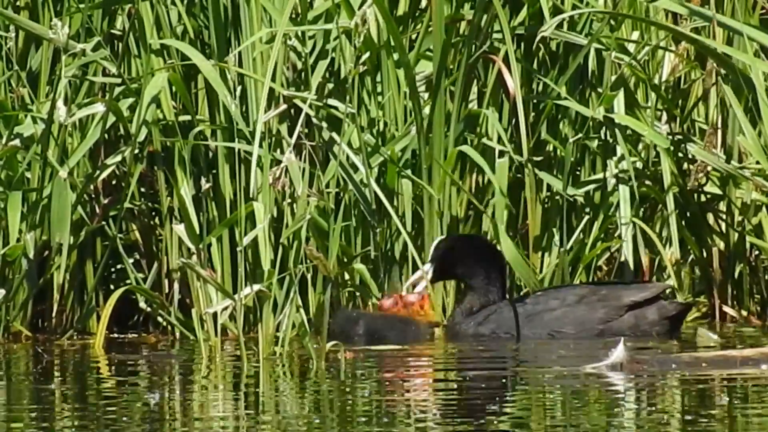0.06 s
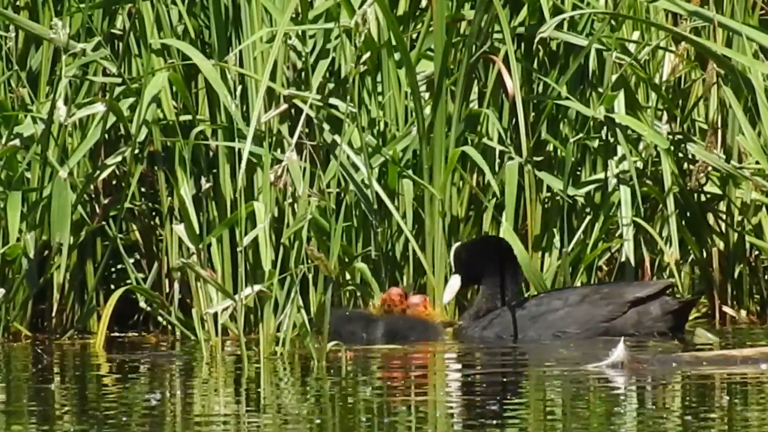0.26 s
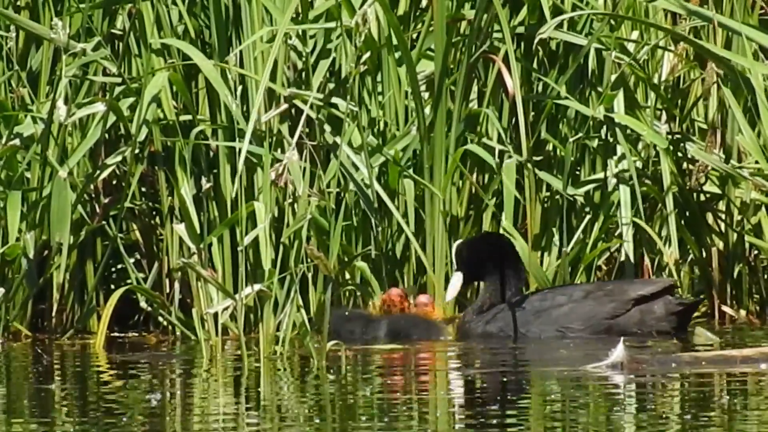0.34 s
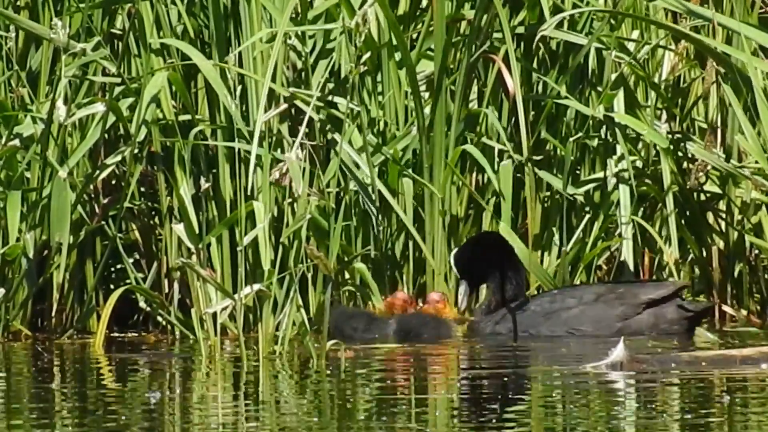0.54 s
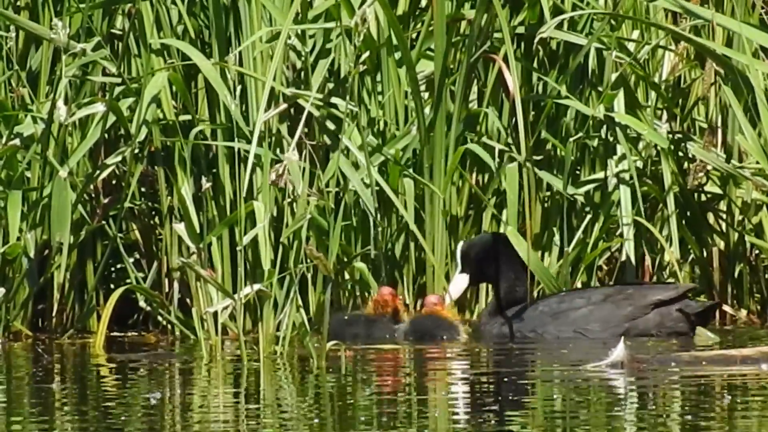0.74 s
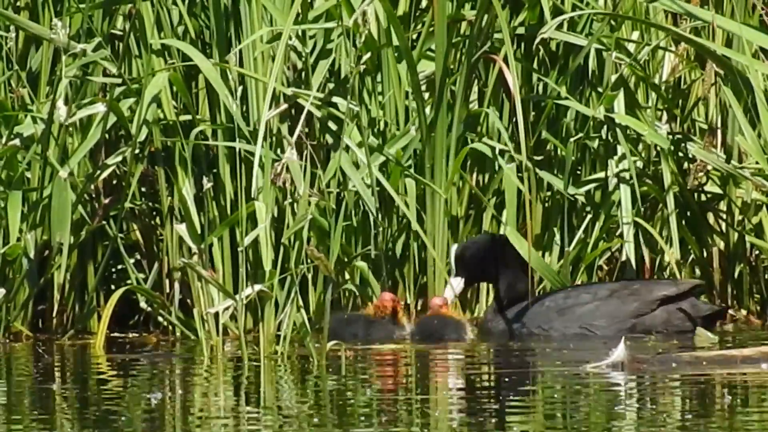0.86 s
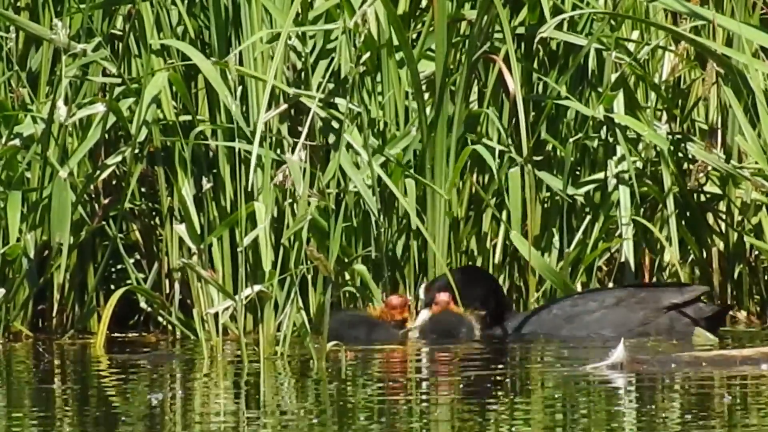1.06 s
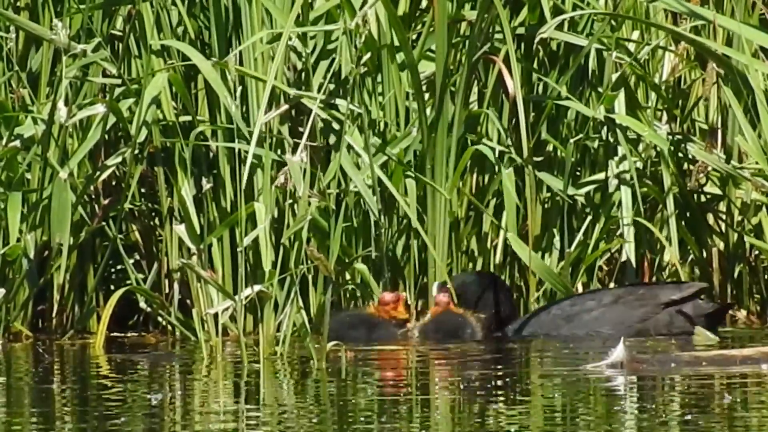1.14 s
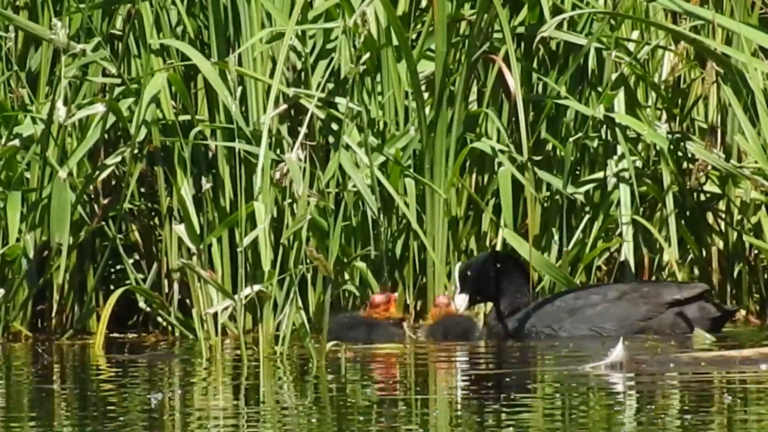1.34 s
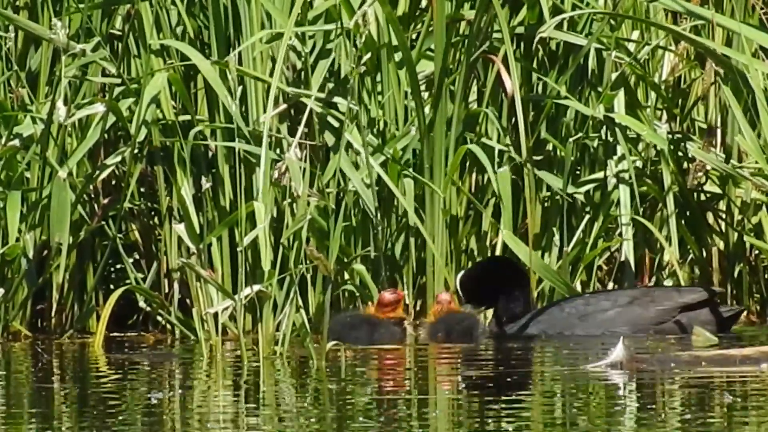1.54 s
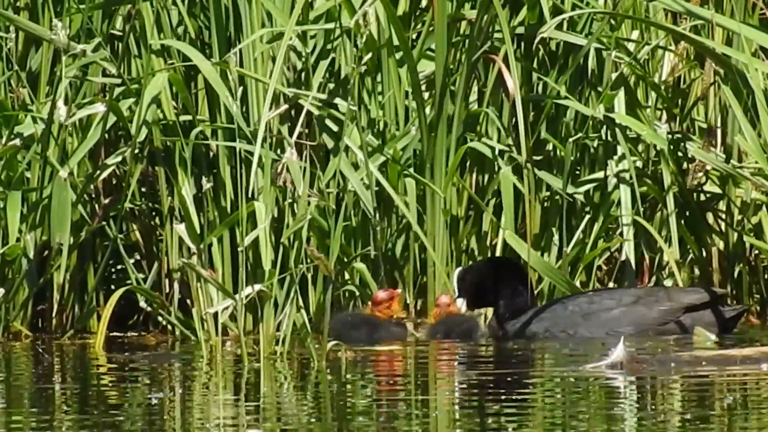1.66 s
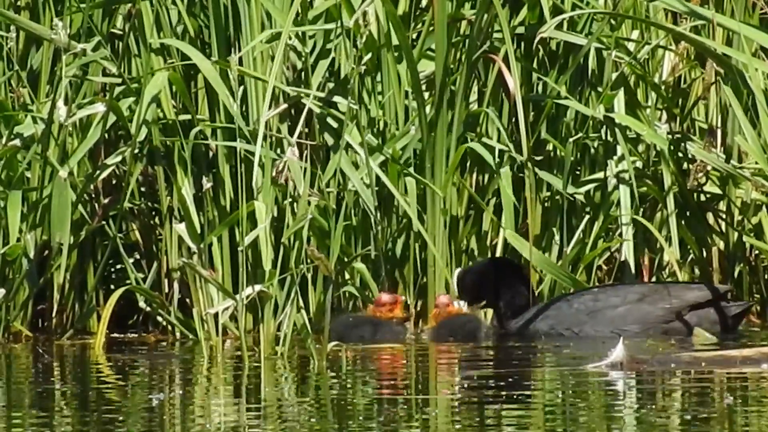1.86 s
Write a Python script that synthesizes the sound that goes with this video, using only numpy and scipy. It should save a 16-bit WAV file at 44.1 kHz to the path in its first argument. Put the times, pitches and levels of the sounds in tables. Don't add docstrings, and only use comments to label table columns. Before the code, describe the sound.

Faint hoarse chatter over soft outdoor rumble, then a near warbler's gritty two-toned trill, abrupt chack and throbbing rasp, followed by thin far whistles and quick glides; close stereo microphones, open pond edge with diffuse reed echoes.

```python
import sys
import numpy as np
from scipy import signal
from scipy.fft import rfft, irfft
from scipy.io import wavfile
from scipy.ndimage import uniform_filter1d

SR = 44100
rng = np.random.default_rng(int(sys.argv[2]) if len(sys.argv) > 2 else 0)


def undo_db(level):
    steps = np.asarray(level, float) / 20
    return 10 ** steps


def output_pcm(signal):
    pcm = np.clip(np.atleast_2d(signal).T, -1, 1) * 32767
    wavfile.write(sys.argv[1], SR, np.round(pcm).astype(np.int16))


N = 83790
T = np.arange(N) / SR

# pitch_hz [Hz], density_db [dB per Hz]
FLOOR_SPECTRUM = [(40, -4.5), (66, -2), (200, -10), (300, -16.5), (600, -16), (800, -22), (3000, -23.5),
                  (7500, -28.5)]
# pitch_hz [Hz], side_over_mid_db [dB]
FLOOR_WIDTH = [(40, -22), (130, -16.5), (300, -11.5), (1500, -9), (3500, -8), (7000, 1.5), (15000, 2)]
# pitch_hz [Hz], width_hz [Hz], level_db [dB]
DRONES = [(55.8, 11.5, -65.5), (93.3, 26.6, -65), (171.3, 46, -64.5), (611, 64, -77.5), (1142, 550, -73),
          (6430, 1900, -72)]
# start_s [s], length_s [s], from_hz [Hz], to_hz [Hz], level_db [dB]
HOARSE_CALLS = [(-.04, .07, 6600, 6200, -64), (.07, .1, 5900, 5750, -70), (.08, .07, 6700, 6200, -69),
                (.11, .08, 2600, 2800, -68), (1.21, .06, 4200, 4250, -71), (1.37, .1, 7600, 7000, -69),
                (1.622, .05, 4200, 4250, -64), (1.79, .08, 6200, 6100, -67), (1.77, .1, 2050, 2250, -70),
                (1.328, .03, 4600, 4450, -62), (.15, .08, 6000, 5700, -70), (.96, .03, 3700, 3650, -69),
                (.11, .08, 1900, 1500, -68), (.06, .08, 5300, 5200, -72), (1.68, .08, 6600, 6400, -71),
                (1.44, .09, 7050, 6800, -66), (1.48, .09, 3500, 3100, -69), (1.7, .19, 5000, 4900, -72),
                (0, .2, 4900, 4700, -73), (.02, .12, 3900, 3750, -73), (.12, .07, 2250, 2200, -70),
                (.46, .07, 2450, 2500, -66), (1.32, .18, 950, 1150, -72), (1.54, .07, 6700, 6500, -69)]
# start_s [s], length_s [s], from_hz [Hz], to_hz [Hz], level_db [dB]
FAR_WHISTLES = [(.795, .025, 3050, 3550, -67), (.81, .06, 3550, 3620, -64.5),
                (.862, .045, 3620, 3350, -62.5), (.9, .05, 3550, 3450, -65), (.945, .045, 3420, 3600, -62),
                (.965, .09, 2210, 2190, -67), (1.062, .065, 1700, 2200, -64),
                (1.125, .035, 2250, 2950, -63), (1.298, .035, 5080, 5050, -63),
                (1.322, .012, 4800, 4000, -62), (1.333, .014, 4750, 3850, -60),
                (1.345, .012, 3900, 2950, -61), (1.355, .04, 5080, 5080, -66),
                (1.42, .035, 5100, 5100, -71), (1.372, .016, 4600, 4100, -66),
                (1.355, .015, 3500, 3250, -67), (1.368, .125, 6980, 5900, -53.5),
                (1.617, .03, 6350, 5900, -55.5), (1.645, .04, 5900, 5450, -65),
                (1.0, .025, 6300, 5900, -73), (1.435, .02, 2850, 2900, -70), (1.485, .05, 5900, 5550, -63)]
# start_s [s], length_s [s], from_hz [Hz], to_hz [Hz], level_db [dB]
FAR_SWOOPS = [
    (1.458, .068, 3800, 2050, -57.5),
    (1.575, .05, 2300, 3700, -56),
]
# time_s [s], level_db [dB]
RASP_EFFORT = [
    (.568, -52),
    (.582, -55),
    (.612, -49),
    (.666, -56),
    (.704, -53),
    (.73, -90),
]
# pitch_hz [Hz], width_hz [Hz], level_db [dB]
RASP_RESONANCES = [(2200, 970, -7), (2860, 1050, -1.5), (4600, 390, -3.5), (5260, 1600, -2.5),
                   (6180, 1140, -0.5), (8400, 2400, -5)]
# start_s [s], length_s [s], from_hz [Hz], to_hz [Hz], level_db [dB]
NEAR_NOTES = [(.578, .058, 1780, 1720, -58.5), (.594, .03, 5000, 4750, -48.5),
              (.618, .044, 3400, 3200, -54), (.657, .018, 3250, 3850, -53), (.6, .022, 5300, 5150, -54),
              (.634, .036, 4300, 3950, -56), (.622, .035, 6400, 6650, -56), (.7, .03, 2050, 2200, -65),
              (.232, .035, 1800, 1600, -60), (.224, .04, 2200, 2050, -61), (.54, .06, 2980, 2900, -61),
              (.47, .05, 2850, 3000, -63), (.685, .015, 6550, 6500, -57), (.65, .028, 5150, 5450, -58),
              (.368, .016, 4200, 4150, -54), (.57, .03, 5250, 5100, -58)]
# start_s [s], length_s [s], level_db [dB]
CHACK_BURST = (.393, 0.037, -42)
# pitch_hz [Hz], width_hz [Hz], level_db [dB]
CHACK_RESONANCES = [(1680, 520, -3.5), (2490, 630, -2), (4500, 1440, -1.5), (6040, 6000, 1),
                    (7900, 1400, -10)]
# time_s [s], low_hz [Hz], low_db [dB], high_hz [Hz], high_db [dB]
CHURR_VOICES = [
    (.223, 2750, -54.5, 5400, -60),
    (.24, 2680, -57, 5000, -62),
    (.248, 2690, -49, 4850, -62),
    (.305, 2840, -47.5, 4750, -53),
    (.34, 2880, -45, 5000, -54),
    (.36, 2800, -42, 5850, -48),
    (.385, 2770, -42.5, 5950, -45.5),
    (.398, 2700, -43, 5950, -46),
    (.412, 2300, -52, 6050, -44),
]
# pitch_ratio [1], level_db [dB]
LOW_COMPANIONS = [(1.27, -17), (.9, -19)]
# pitch_ratio [1], level_db [dB]
HIGH_COMPANIONS = [(1.12, -12)]
# pitch_hz [Hz], width_hz [Hz], level_db [dB]
BREATH_RESONANCES = [(5970, 1600, 3), (7140, 1200, -3), (8280, 1900, -8)]

LOW_VOICE_ROUGH = 0.32


def level(x, db):
    return x * undo_db(db) / np.sqrt(np.mean(x ** 2))


def walk(rate_hz, n=N):
    hold = max(int(SR / rate_hz), 2)
    steps = np.repeat(rng.standard_normal(n // hold + 2), hold)
    smooth = uniform_filter1d(uniform_filter1d(steps, hold), hold)
    return level(smooth[:n], 0)


def band(x, hz, width_hz):
    b, a = signal.iirpeak(min(hz, 0.45 * SR), hz / width_hz, fs=SR)
    return signal.lfilter(b, a, signal.lfilter(b, a, x))


def gate(start_s, length_s, rise_s, fall_s):
    attack = np.clip((T - start_s) / rise_s, 0, 1)
    release = np.clip((start_s + length_s - T) / fall_s, 0, 1)
    return attack * release


def tone(hz, rough):
    shake = walk(700, len(hz)) + 1j * walk(700, len(hz))
    carrier = np.exp(2j * np.pi * np.cumsum(hz) / SR)
    return np.sqrt(2) * np.imag((1 - rough + 0.75 * rough * shake) * carrier)


def throat(resonances):
    out = np.zeros(N)
    for hz, width_hz, db in resonances:
        out += undo_db(db) * level(band(rng.standard_normal(N), hz, width_hz), 0)
    return level(out, 0)


def whistles(calls, bend, rough, fade_db=0):
    out = np.zeros(N)
    for start_s, length_s, from_hz, to_hz, db in calls:
        on = (T > start_s) & (T < start_s + length_s)
        u = (T[on] - start_s) / length_s
        height = (u if to_hz > from_hz else 1 - u) ** bend
        glide_hz = min(from_hz, to_hz) + abs(to_hz - from_hz) * height
        voice = tone(glide_hz * (1 + 0.006 * walk(45, len(u))), rough)
        swell = (4 * u * (1 - u)) ** 0.35
        flutter_db = 2 * walk(89.6, len(u))
        out[on] += voice * swell * undo_db(db + fade_db * (0.5 - height) + flutter_db)
    return out


def placed(x, pan_db, lead_s, wet_db, t60_s):
    t = np.arange(int(0.6 * SR)) / SR
    common, apart = rng.standard_normal((2, len(t)))
    apart = signal.sosfilt(signal.butter(2, 4550, "high", fs=SR, output="sos"), apart)
    decay = np.exp(-np.log(1000) * t / t60_s) * (1 - np.exp(-t / 0.0011))
    tail = (common + 1.23 * apart * np.array([[1], [-1]])) * decay
    tail = tail / np.sqrt(np.sum(tail.mean(axis=0) ** 2))
    delay = np.exp(-1j * np.pi * np.arange(N + 1) / N * lead_s * SR)
    late = irfft(rfft(x, 2 * N) * delay)[:N]
    scattered = signal.fftconvolve(x[None], tail, axes=1)[:, :N]
    heard = np.array([x, late]) + undo_db(wet_db) * scattered
    return heard * undo_db(np.array([[pan_db], [-pan_db]]) / 2)


def read_curve(table, hz):
    curve_hz, curve_db = np.array(table).T
    return np.interp(np.log(hz), np.log(curve_hz), curve_db)


def wide_noise(hz, width_hz):
    mid = band(rng.standard_normal(2 * N), hz, width_hz)[N:]
    side = band(rng.standard_normal(2 * N), hz, width_hz)[N:]
    return mid + undo_db(read_curve(FLOOR_WIDTH, hz)) * side * np.array([[1], [-1]])


def pond():
    floor, swell = 0, walk(1.92)
    for hz in 40 * 2 ** np.arange(0, 8.1, 1 / 3):
        band_db = read_curve(FLOOR_SPECTRUM, hz) + 0.5 * swell + 2.8 * walk(4.72)
        floor = floor + undo_db(band_db) * wide_noise(hz, hz * 0.38)
    out = level(floor, -59.5)
    for hz, width_hz, db in DRONES:
        out = out + level(wide_noise(hz, width_hz), db) * undo_db(1.5 * walk(5.29))
    return out


def far_birds():
    clear = whistles(FAR_WHISTLES, bend=0.98, rough=0.28)
    swoops = whistles(FAR_SWOOPS, bend=2.2, rough=0.38, fade_db=-20)
    hoarse = whistles(HOARSE_CALLS, bend=0.96, rough=0.9)
    return (clear + swoops + hoarse) * undo_db(2.5)


def rasp():
    s, db = np.array(RASP_EFFORT).T
    throb = 1 + 0.46 * np.sin(2 * np.pi * 95 * T + 1.03 * walk(30.2))
    effort = undo_db(np.interp(T, s, db)) * gate(s[0], s[-1] - s[0], 0.0083, 0.01)
    notes = whistles(NEAR_NOTES, bend=1, rough=LOW_VOICE_ROUGH)
    return throat(RASP_RESONANCES) * throb * effort + undo_db(0.3) * notes


def chack():
    start_s, length_s, db = CHACK_BURST
    return throat(CHACK_RESONANCES) * gate(start_s, length_s, 0.01, 0.017) * undo_db(db)


def churr():
    s, low_hz, low_db, high_hz, high_db = np.array(CHURR_VOICES).T
    throb_hz, beat_s = 81.7, 0.3715
    cycle = 2 * np.pi * (T - beat_s) * throb_hz + 0.17 * walk(39.2)
    breath_db = np.interp(T, s, high_db) - 3.5
    out = throat(BREATH_RESONANCES) * undo_db(breath_db) * gate(s[0], 0.87, 0.02, 0.64)
    voices = ((low_hz, low_db, 0, LOW_VOICE_ROUGH, 0.15, LOW_COMPANIONS),
              (high_hz, high_db, 0.7, 0.8, 0.5, HIGH_COMPANIONS))
    for hz, db, lag, rough, fill, companions in voices:
        turn = cycle - 2 * np.pi * lag
        pitch_hz = np.interp(T, s, hz) * (1 + 0.03 * np.sin(turn))
        voice = tone(pitch_hz, rough)
        for ratio, companion_db in companions:
            voice = voice + undo_db(companion_db) * tone(pitch_hz * ratio, 0.99)
        throb = level(((1 + np.cos(turn)) / 2 + fill) ** 1.1, 0)
        uneven_db = walk(78.2)
        out = out + voice * throb * undo_db(np.interp(T, s, db) + uneven_db)
    return out * gate(s[0], s[-1] - s[0] + 0.025, 0.0016, 0.035)


def scene():
    near_lead_s, near_t60_s = -0.00002, 0.3
    far = placed(far_birds(), pan_db=0.7, lead_s=0, wet_db=-1, t60_s=0.5)
    rasping = placed(rasp(), 0.8, near_lead_s, -1.5, near_t60_s)
    churring = placed(churr() * undo_db(1.65) + chack(), 3, near_lead_s, -1.5, near_t60_s)
    return pond() + far + rasping + churring


def top_cut(x):
    return signal.sosfilt(signal.butter(12, 15680, fs=SR, output="sos"), x)


def record(dry):
    x = signal.sosfilt(signal.butter(4, 42, "high", fs=SR, output="sos"), dry)
    x = signal.sosfilt(signal.butter(6, 7400, fs=SR, output="sos"), x)
    hiss_band = signal.butter(1, [2500, 6040], "band", fs=SR, output="sos")
    hiss = signal.sosfilt(hiss_band, rng.standard_normal(dry.shape))
    return top_cut(x + level(hiss, -69.5))


dry = scene()
out = record(dry)
output_pcm(out)
```